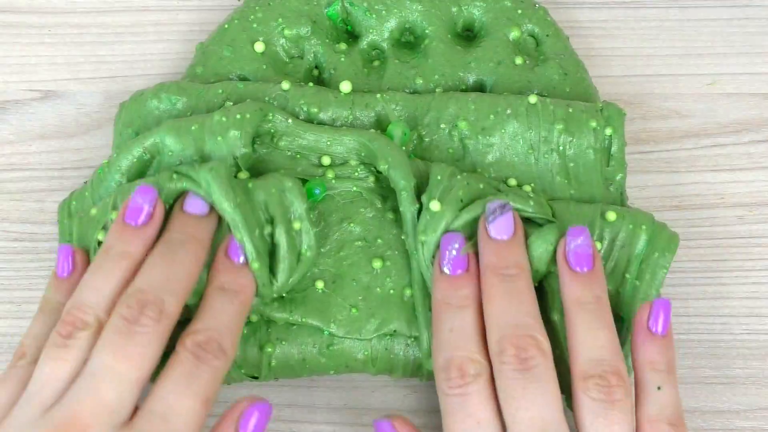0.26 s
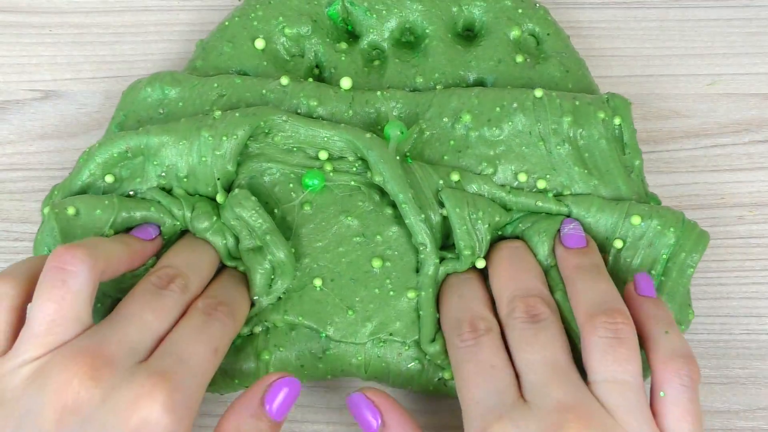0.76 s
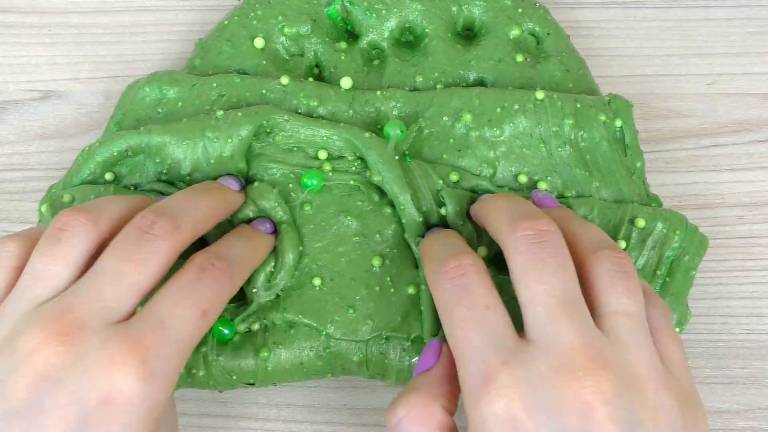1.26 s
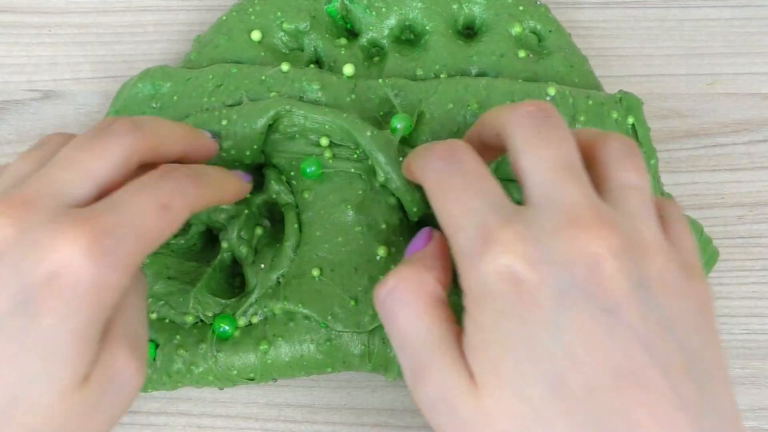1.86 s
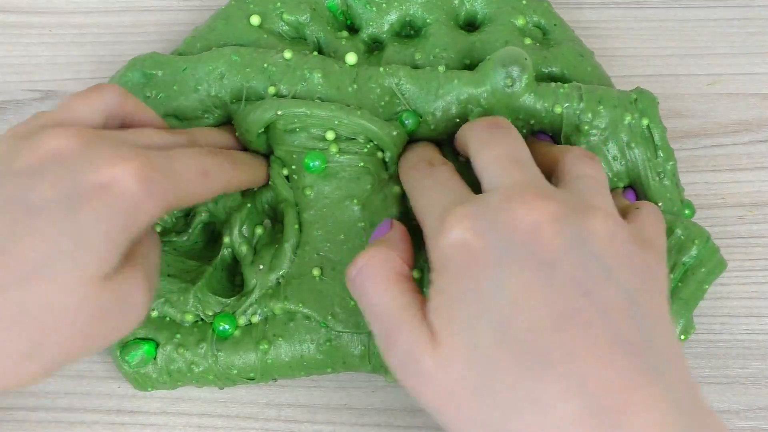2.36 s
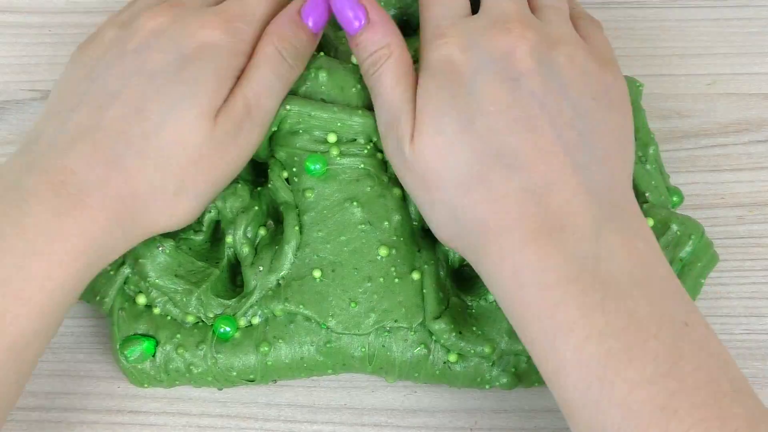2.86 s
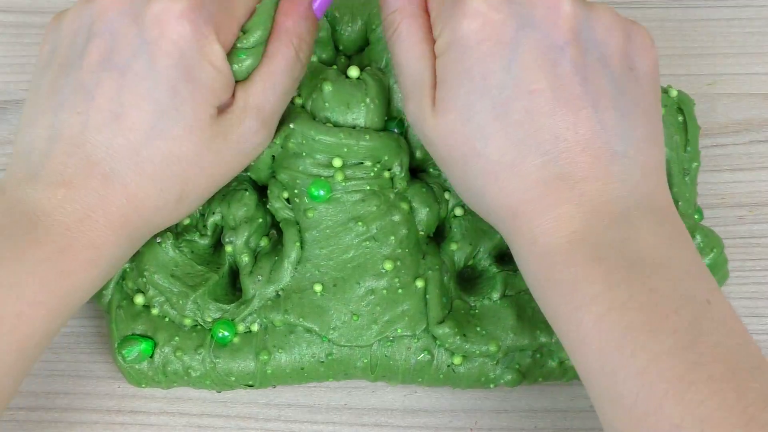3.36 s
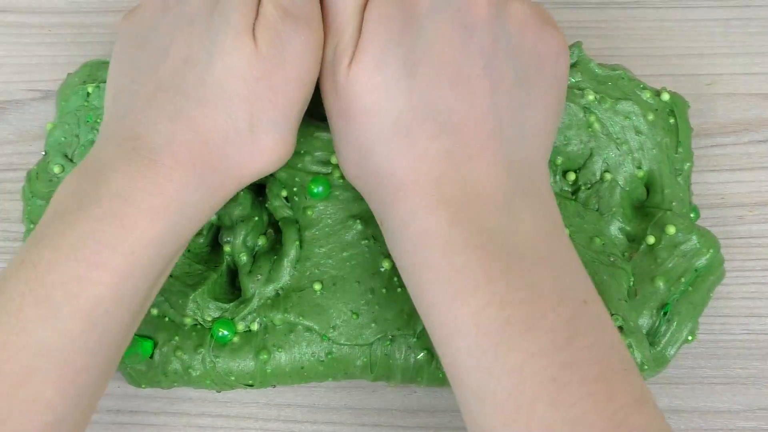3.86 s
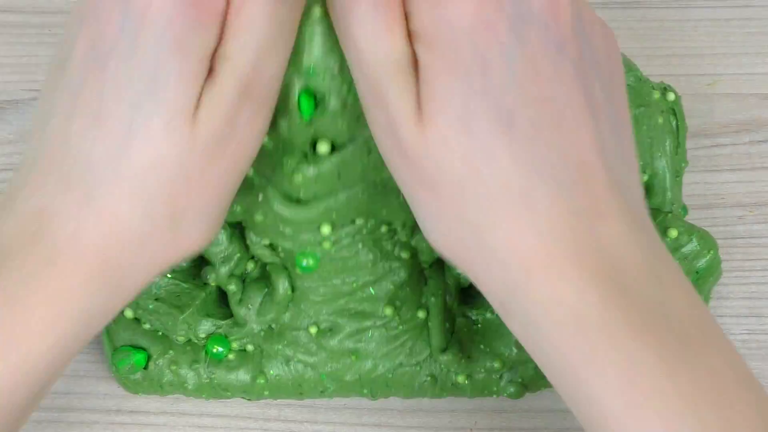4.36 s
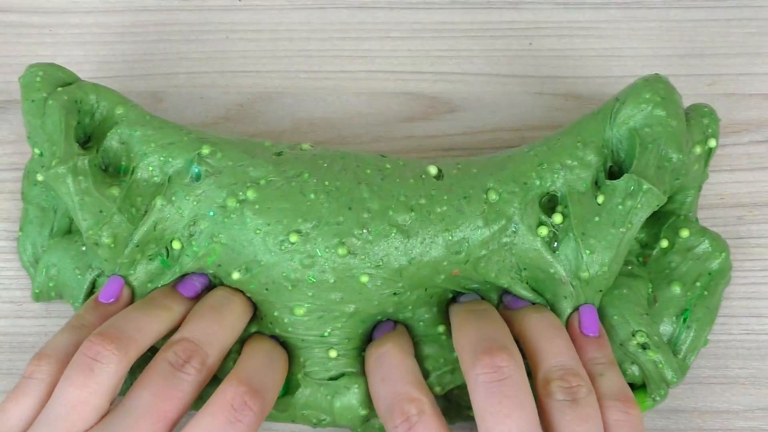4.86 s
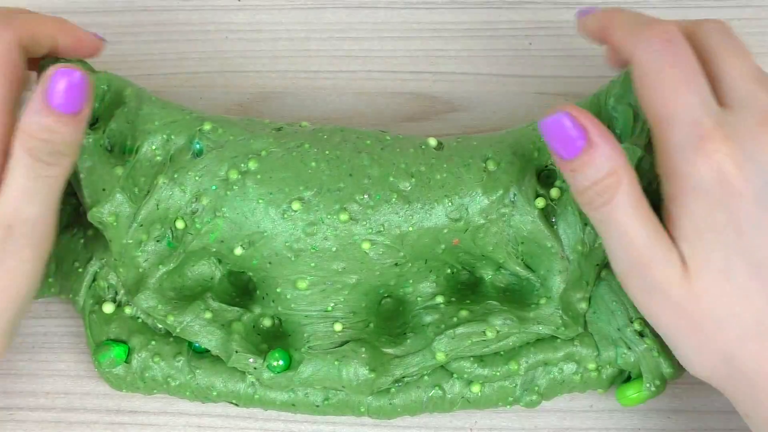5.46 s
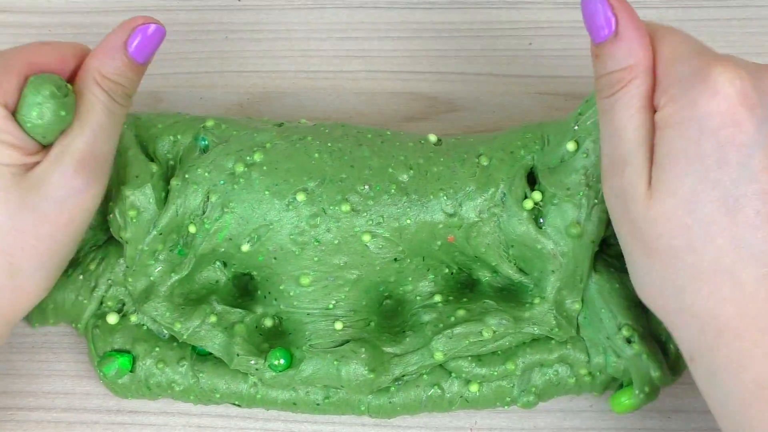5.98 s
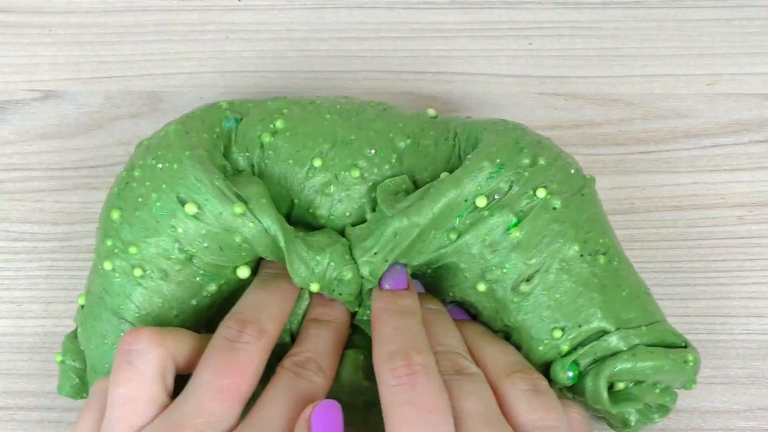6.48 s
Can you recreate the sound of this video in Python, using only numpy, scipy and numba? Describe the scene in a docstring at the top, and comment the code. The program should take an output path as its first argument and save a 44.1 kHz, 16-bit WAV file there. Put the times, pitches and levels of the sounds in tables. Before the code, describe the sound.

Hands press and fold sticky slime close up: wet squelches, sharp bright pops, fizzing crackles and soft table thuds in a quiet room.

```python
"""A quiet room with a low wavering tone and faint sticky ticks, then pops and squishes: two hands press, fold
and pull a heap of slime on a wooden table, close to a stereo microphone. Each pop is a few clicks shaped into
short tones, the tearing skin is swarms of clicks through resonances, and a gliding resonance is the main air
pocket. Noise pushes and the pops ring the table top; a small room answers pops and skin."""
import sys
import numpy as np
from scipy import signal
from scipy.fft import rfft, irfft
from scipy.io import wavfile
from scipy.ndimage import uniform_filter1d
from numba import njit

SR = 44100
rng = np.random.default_rng(int(sys.argv[2]) if len(sys.argv) > 2 else 0)


def to_wav(sig):
    """Store sig (one row per channel, or 1-D mono) as 16-bit WAV at the path in sys.argv[1].

    Samples outside -1..1 are clipped; the rate is SR.
    """
    pcm = np.clip(np.atleast_2d(sig), -1, 1) * 32767
    pcm = np.round(pcm).astype(np.int16)
    wavfile.write(sys.argv[1], SR, pcm.T)  # frames by channels


N = 296352


def undb(db):
    """Turn dB into an amplitude factor."""
    return 10 ** (np.asarray(db) / 20)


def level(x, db):
    """Set the RMS level of x in dB."""
    return x * undb(db) / np.sqrt(np.mean(x ** 2))


def ring(x, hz, width):
    """Two-pole resonance, gain 1 at the centre; width in Hz."""
    b, a = signal.iirpeak(min(hz, 0.45 * SR), hz / width, fs=SR)
    return signal.lfilter(b, a, x)


def colour(x, modes):
    """Parallel resonances of one body, with alternating sign."""
    return sum((-1) ** k * undb(db) * ring(x, hz, width) for k, (hz, width, db) in enumerate(modes))


def walk(rate):
    """Random values about 1 / rate s apart, joined by straight slides; spread about 1.3."""
    step = int(SR / rate)
    held = np.repeat(rng.standard_normal(N // step + 1), step)
    return 1.62 * uniform_filter1d(held, step)[:N]


def swarm(rate, scatter_db):
    """Random clicks, rate per second on average, most small and a few large; RMS 1."""
    chance = rng.random(N)
    size = np.minimum(rng.exponential(size=N), 3.2)
    sign = np.sign(rng.standard_normal(N))
    return level((chance < rate / SR) * undb(scatter_db * size) * sign, 0)


def grains(modes, rate, scatter_db, patchy_db):
    """Each pocket size bursts in its own swarm, in uneven fits, retuned at random on every call."""
    out = 0
    for hz, width, db in modes:
        fits = undb(db + patchy_db * walk(18))
        clicks = swarm(rate, scatter_db)
        out = out + fits * ring(clicks, hz * 1.247 ** rng.uniform(-1.28, 1), width)
    return out


def wavelet(hz, cycles):
    """A short tone that swells and dies evenly, centred at sample 128."""
    turns = (np.arange(256) - 128) * hz / SR
    return np.exp(-(turns / max(cycles, 0.15)) ** 2) * np.sin(2 * np.pi * turns)


@njit
def glide(x, hz, width):
    """Resonance whose centre moves; width is a share of the centre, gain 1 there."""
    y, band, low = np.empty(len(x)), 0., 0.
    for i in range(len(x)):
        g = np.tan(np.pi * hz[i] / SR)
        v = (band + g * (x[i] - low)) / (1 + g * (g + width))
        band, low, y[i] = 2 * v - band, low + 2 * g * v, width * v
    return y


# Spectrum of the room's quiet. Each row: frequency in Hz, relative density in dB per Hz.
HUSH_SPECTRUM = [(18, -46), (30, -6.5), (66, -6.5), (114, -2.5), (480, -9.5), (575, -19), (1330, -10.5),
                 (5170, -28), (15500, -25.5)]
# The low wavering tone. One row: centre in Hz, width in Hz, RMS level in dB before the slow sway.
LOW_TONE = (157, 1.9, -78)


def hush():
    """The quiet of the room: wide shaped noise, and noise through a narrow resonance as a wavering low tone."""
    hz = np.maximum(np.fft.rfftfreq(N, 1 / SR), 1)
    mid, side = rfft(rng.standard_normal((2, N)))
    points, db = np.transpose(HUSH_SPECTRUM)
    shape = undb(np.interp(np.log(hz), np.log(points), db))
    spread = np.clip(hz / 6000, 0.55, 0.8) * np.array([[1], [-1]])  # wider towards the treble
    air = irfft((mid + spread * side) * shape, N)
    tone_hz, tone_width, tone_db = LOW_TONE
    tone = level(ring(rng.standard_normal(N), tone_hz, tone_width), tone_db)
    sway = undb(1.5 * walk(5))
    return (level(air, -68.5) + tone) * sway


# Pitch of the main air pocket as the fingers open and close it, before its random wander.
# Each row: time in seconds, pitch in Hz.
POCKET_PITCH = [(1.1, 2800), (1.82, 2400), (1.87, 4000), (2.53, 2900), (2.0, 2570), (2.95, 2420),
                (3.05, 4300), (3.12, 2600), (3.64, 2900), (3.69, 4200), (3.93, 3900), (4.47, 3900),
                (5.29, 3000), (5.33, 3900), (6.13, 4300), (6.43, 2500)]


def pocket(x):
    """The main air pocket rings with whatever drives it; its pitch slides and wanders."""
    slide = np.interp(np.arange(N) / SR, *np.transpose(POCKET_PITCH))
    hz = slide * np.exp(0.19 * walk(40))
    return glide(x, hz, 0.15)


# Larger pockets in the middle range. Each row: nominal centre in Hz, width in Hz, relative level in dB.
SQUELCH_MODES = [(1183, 220, 0.5), (2020, 1050, -1), (5670, 9300, -7)]
# The finest threads on top. Each row: nominal centre in Hz, width in Hz, relative level in dB.
SIZZLE_MODES = [(7400, 2400, -8.5), (9300, 1400, -5), (11300, 5400, 8.5), (14300, 1300, -9)]


def skin(squelch, sizzle):
    """Larger pockets squelch in the middle range, the finest threads sizzle on top; faint ticks never stop."""
    uneven = undb(3 * walk(60))
    sticky = level(pocket(uneven * swarm(220, 4.5)), 0.5)
    wet = level(grains(SQUELCH_MODES, 300, scatter_db=4.5, patchy_db=2.5), 0) + sticky
    threads = grains(SIZZLE_MODES, 400, scatter_db=5.0, patchy_db=2.5)
    # the small constants keep the ticks going between squishes
    low = level(wet, -8.0) * (squelch + undb(-75.5))
    high = level(threads, -1.6) * (sizzle + undb(-90.0))
    return low + high


RING_CYCLES, CYCLES_PER_OCTAVE = 0.6, 0.066  # at 1 kHz, and more for each octave above
# Bursting air pockets. Each row: start of the tear in seconds, level of the snap in dB before the room,
# pitch in Hz, cavity level in dB relative to the snap before the common lift.
POP_EVENTS = [(0.369, -39, 11300, -21), (0.55, -52, 990, 0.5), (0.726, -38.5, 12000, -18.5),
              (1.0539, -23, 10000, -38), (1.0604, -29.5, 3220, -25), (1.064, -14.5, 9500, -27),
              (1.0746, -8, 9160, -21), (1.308, -44.5, 3720, -47), (1.439, -49, 1500, -8.5),
              (1.556, -33, 13100, -24.5), (1.618, -36, 9900, -24.5), (1.699, -41, 12600, -28),
              (1.778, -40.5, 1270, 0), (1.7825, -21.5, 8100, -26), (1.8, -22, 8800, -38),
              (1.8176, -30.5, 2480, -30), (2.031, -22.5, 13900, -50), (2.079, -24.5, 980, -18.5),
              (2.117, -29, 11900, -44), (2.144, -47, 1030, -5), (2.165, -47.5, 1480, -7.5),
              (2.172, -33, 12000, -38), (2.195, -26.5, 10700, -27.5), (2.4967, -13.5, 10600, -23),
              (2.515, -5, 9700, -25), (2.887, -18.5, 2060, -12), (3.018, -42, 8050, -16),
              (3.036, -27, 4000, -32), (3.0508, -24, 3800, -30), (3.0623, -26, 3680, -30),
              (3.214, -29, 14200, -19), (3.282, -20, 12900, -32), (3.326, -20, 9250, -50),
              (3.389, -16.5, 9300, -29.5), (3.421, -11, 11800, -39), (3.424, -8, 10300, -32.5),
              (3.471, -34.5, 1790, 3), (3.474, -13, 13700, -44), (3.612, -32, 3350, -40),
              (3.868, -14.5, 5000, -11), (3.919, -32, 3830, 1.5), (3.966, -30, 5300, -11),
              (4.016, -20, 13900, -24.5), (4.119, -31, 2730, -6.5), (4.145, -24, 10900, -37),
              (4.163, -22.5, 8160, -14.5), (4.197, -26, 8150, -20), (4.208, -17, 10100, -28),
              (4.216, -13, 10200, -27.5), (4.26, -12.5, 9800, -37), (4.466, -24.5, 9300, -23),
              (4.4714, -28, 9050, -22), (4.661, -32, 9800, -14), (4.702, -24, 12000, -27.5),
              (4.922, -17, 10150, -32.5), (5.265, -24.5, 3830, -22), (5.627, -33.5, 3640, -11.5),
              (5.6786, -23.5, 11800, -18.5), (5.791, -40.5, 2430, -11.5), (5.774, -40, 5200, -27),
              (5.83, -37, 9000, -7.5), (5.846, -45, 1760, -26), (5.885, -3, 12560, -43),
              (5.9453, -8, 13300, -41), (5.9647, -34.5, 8050, -12), (6.212, -20, 8800, -20),
              (6.268, -26, 9300, -28.5), (6.407, -22.5, 4060, -40), (6.409, -20, 2490, -28),
              (6.4198, -30, 10300, -15), (6.5376, -33, 11300, -21), (6.6666, -27.5, 11800, -52)]


def pops(cavity_lift_db=12, cavity_hz=1900, tear_s=0.001208, twin_s=0.002, after_s=0.02, after_db=-17):
    """A film starts to tear, snaps, snaps again faintly over a duller cavity, and its shreds crack after it."""
    out = np.zeros((3, N + 4096))
    chance = rng.random((len(POP_EVENTS), 9))
    for k, ((s, db, hz, cavity_db), (luck, *shreds)) in enumerate(zip(POP_EVENTS, chance)):
        clicks = np.zeros(1024)
        late = np.array(shreds) ** 1.2
        shred_at = (SR * (tear_s + 0.0006 + after_s * late)).astype(int)
        clicks[shred_at] = undb(after_db - 12 * late) * np.cos(99 * late)  # uneven size and sign
        clicks[0] = undb(-37)  # the tear begins
        clicks[int(tear_s * SR)] = 1  # the snap
        clicks[int((tear_s + twin_s) * SR)] = undb(-57.5 + 18.5 * luck)  # the second snap
        cycles = RING_CYCLES + CYCLES_PER_OCTAVE * np.log2(hz / 1000)
        film = wavelet(hz, cycles)
        cavity = undb(cavity_db + cavity_lift_db) * wavelet(cavity_hz, 0.25)
        pop = np.convolve(clicks, film + cavity)
        at = int(s * SR) - 128
        out[k % 3, at:at + len(pop)] += undb(db) * pop  # three places on the heap
    return out[:, :N]


# Scattered answer of the room. Each row: band centre in Hz, time to fall 60 dB in seconds, band level in dB.
ROOM_BANDS = [(520, 0.55, -44.5), (1380, 0.22, -32), (3860, 0.16, -31.5), (7400, 0.21, -40),
              (10400, 0.07, -40.5)]


def room(x):
    """Direct sound, scattered echoes from hands and table, then a tail that dies band by band."""
    t = np.arange(SR // 2) / SR
    answer = np.zeros((2, len(t)))
    answer[:, 0] = 1  # direct sound
    shared = rng.standard_normal(len(t))
    sparse = rng.random(len(t)) < 0.06
    onset = np.minimum(t / 0.0012, 1)
    early = sparse * undb(25.0) * 1000. ** (-t / 0.023)
    for hz, t60, db in ROOM_BANDS:
        noise = shared + 0.72 * rng.standard_normal((2, len(t)))
        fade = 1000. ** (-t / t60) + early
        answer += undb(db) * ring(noise * fade * onset, hz, 1.096 * hz)
    return signal.fftconvolve(x[None], answer, axes=1)[:, :N]


# One squeeze of the hands a row. Each row: peak in seconds, then drive levels in dB before each layer's own
# gain: squelch, sizzle, low thud; knock level in dB above the low thud, rise in seconds, fall in seconds.
SQUISH_EVENTS = [(0.547, -59.5, -81, -68, 8.5, 0.016, 0.0089), (1.095, -41, -50.5, -58, 15, 0.037, 0.053),
                 (1.458, -57.5, -69, -91, 18, 0.019, 0.01), (1.58, -67, -76, -91, 14, 0.063, 0.022),
                 (1.823, -41, -51, -48, 5, 0.052, 0.038), (2.089, -87, -82, -49, 0.5, 0.0017, 0.035),
                 (2.519, -38.5, -59, -53.5, 7, 0.031, 0.051), (2.83, -59, -79, -65.5, -5, 0.031, 0.11),
                 (2.914, -55.5, -80, -53, -6.5, 0.042, 0.058), (3.092, -33.5, -68, -58, 5, 0.051, 0.058),
                 (3.3, -57, -60, -78.5, 8.5, 0.13, 0.48), (3.488, -53, -39, -76, 4, 0.019, 0.017),
                 (3.691, -35, -51.5, -48, -8, 0.063, 0.028), (3.9, -45, -75, -48, -5, 0.033, 0.1),
                 (4.199, -45.5, -53.5, -88, 13, 0.073, 0.052), (4.449, -49.5, -54.5, -69, 4, 0.15, 0.14),
                 (4.69, -65.5, -69, -75, 0, 0.12, 0.087), (5.294, -39.5, -49, -56.5, 13, 0.034, 0.034),
                 (5.638, -48.5, -79, -55.5, -1.5, 0.012, 0.034), (5.769, -57, -61.5, -81.5, 4, 0.084, 0.12),
                 (5.959, -57, -50, -88, -6, 0.027, 0.03), (6.168, -46.5, -51, -71, 6.5, 0.08, 0.083),
                 (6.45, -54, -89, -78, -2, 0.038, 0.082), (6.6, -64.5, -73, -84.5, 3, 0.28, 0.1)]


def squeezes():
    """Bell-shaped swells drive squelch, sizzle, low thud and upper knock, adding in power."""
    flatness = 2.17  # 2 is a plain bell, more gives a flatter top and steeper flanks
    low_lag, knock_lead = 0.46, 0.17  # shares of the rise
    t = np.arange(N) / SR
    power = np.full((4, N), 1e-9)
    for s, squelch_db, sizzle_db, thud_db, bright_db, rise, fall in SQUISH_EVENTS:
        shift = np.array([[0], [0], [low_lag * rise], [-knock_lead * rise]])
        late = t - s - shift
        bell = np.exp(-np.abs(late / np.where(late < 0, rise, fall)) ** flatness)
        peaks = undb([squelch_db, sizzle_db, thud_db, thud_db + bright_db])
        power += (peaks[:, None] * bell) ** 2
    return np.sqrt(power)


# Upper modes of the table top. Each row: centre in Hz, width in Hz, relative level in dB.
UPPER_TABLE = [(201, 21, -13), (289.4, 14.7, 4), (350.8, 16, 1), (430, 17, -2.5), (688, 55, -18)]
# Low modes of the table top. Each row: centre in Hz, width in Hz, relative level in dB.
LOW_TABLE_MODES = [(120.5, 8.7, 6.5), (76.5, 170, -19)]


def table(low, high, bursts):
    """Uneven pushes of the hands and the bursts set the table top ringing; the pushes differ left and right."""
    apart = 0.22 * np.array([[1], [-1]])
    out = 0
    for modes, force, db in ((LOW_TABLE_MODES, low, 29), (UPPER_TABLE, high, 25)):
        mid, side = rng.standard_normal((2, N))
        push = (mid + apart * side) * force
        out = out + undb(db) * colour(push, modes)
    struck = ring(bursts, 413, 1600)
    return out + undb(15.5) * colour(struck, UPPER_TABLE + LOW_TABLE_MODES)


# Band thinned by the echo off the table top. One row: centre in Hz, width in Hz.
BOUNCE_BAND = (826, 272)


def bounce(x):
    """The echo off the table top partly cancels one band."""
    return x - 0.46 * ring(x, *BOUNCE_BAND)


def scene():
    """Three places on the heap, each with its own echoes, over the table and the quiet room."""
    squelch, sizzle, low, high = squeezes()
    places = pops()
    heap = 0
    for place in places:
        pocket_ring = undb(-3) * pocket(place)
        heap = heap + room(place + pocket_ring + skin(squelch, sizzle))
    return bounce(heap) + table(low, high, places.sum(axis=0)) + hush()


def record(dry):
    """The recorder cuts the top with a steep low-pass at 16.1 kHz."""
    return signal.sosfilt(signal.ellip(10, 0.2, 70, 16100, fs=SR, output="sos"), dry)


dry = scene()
out = record(dry)
to_wav(out)
```